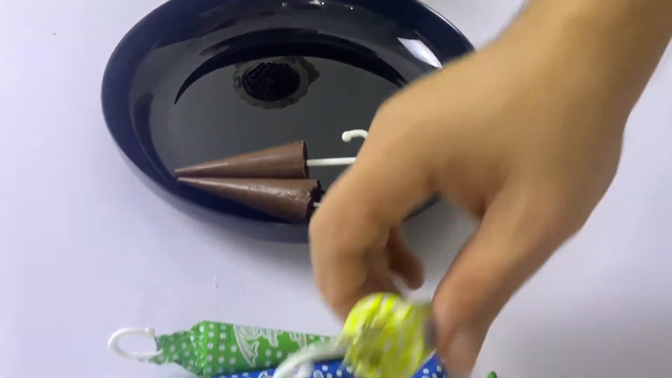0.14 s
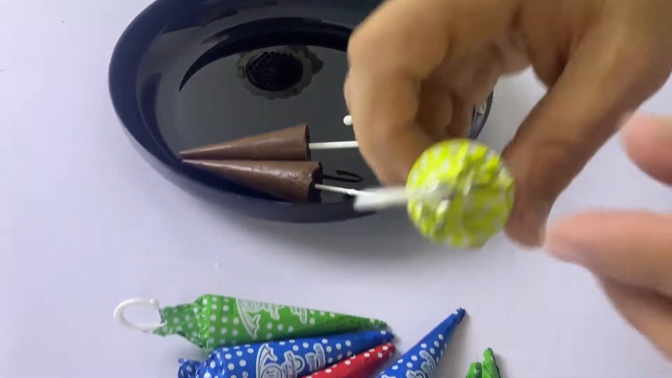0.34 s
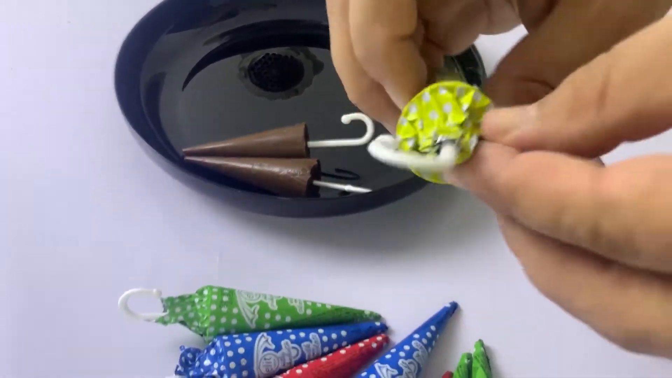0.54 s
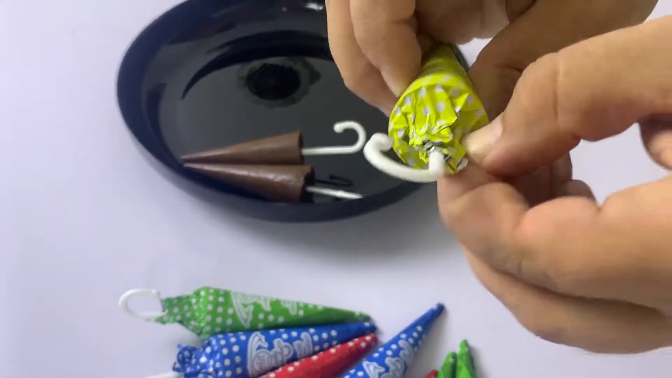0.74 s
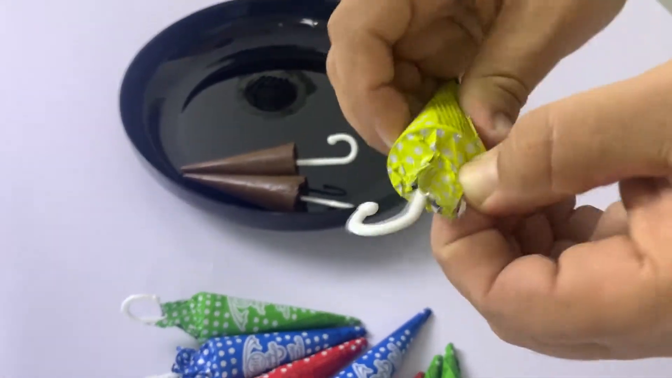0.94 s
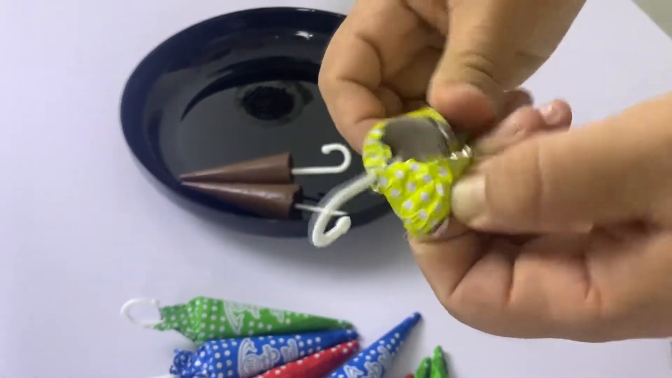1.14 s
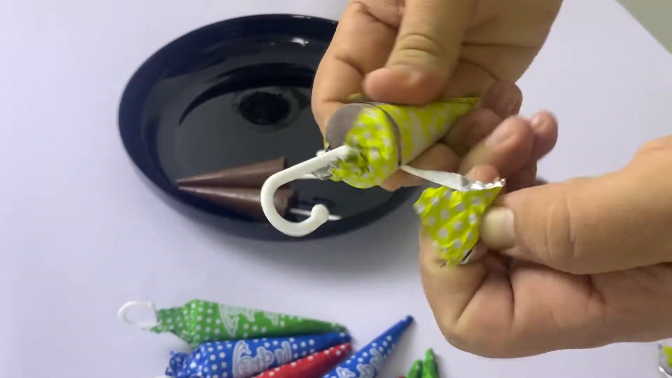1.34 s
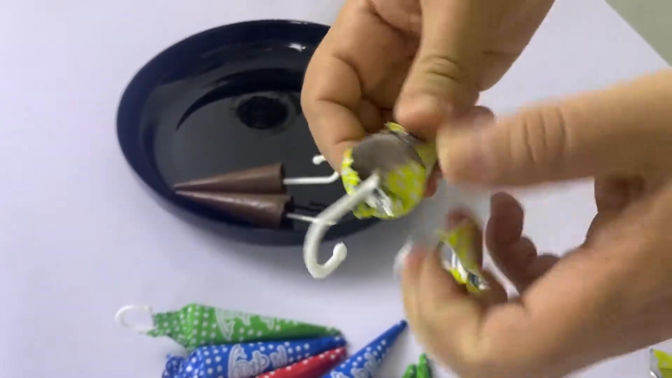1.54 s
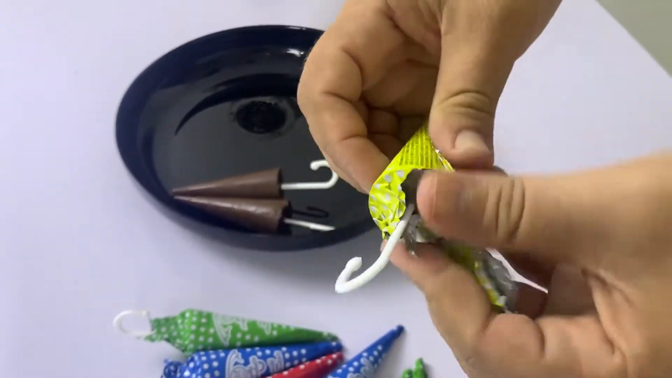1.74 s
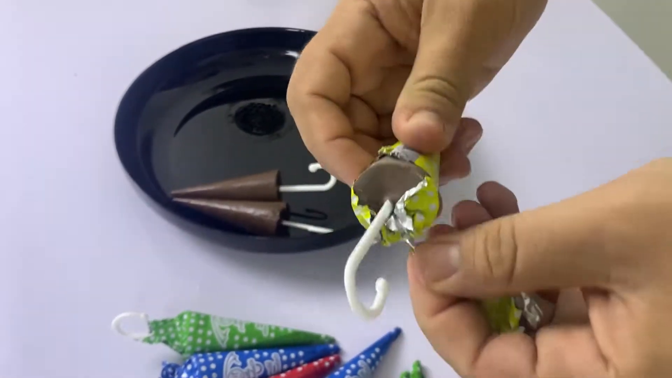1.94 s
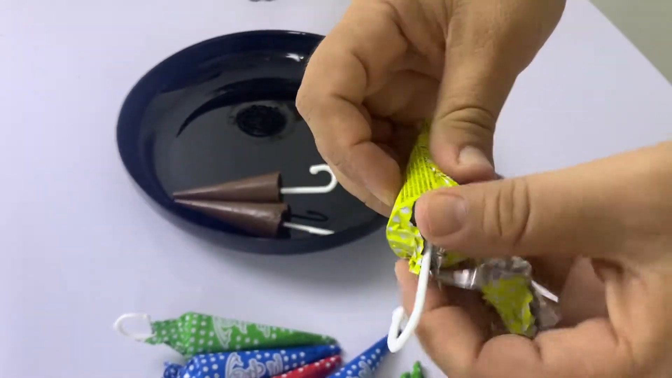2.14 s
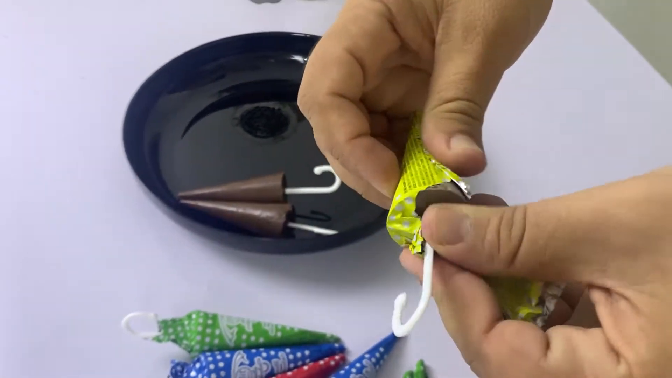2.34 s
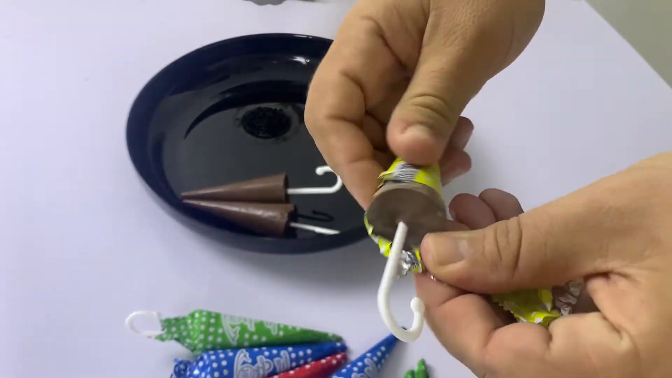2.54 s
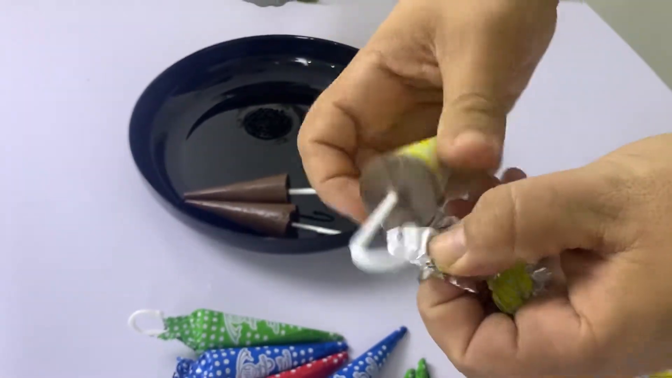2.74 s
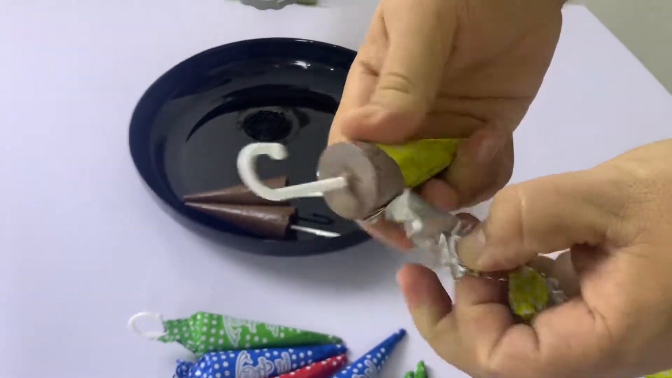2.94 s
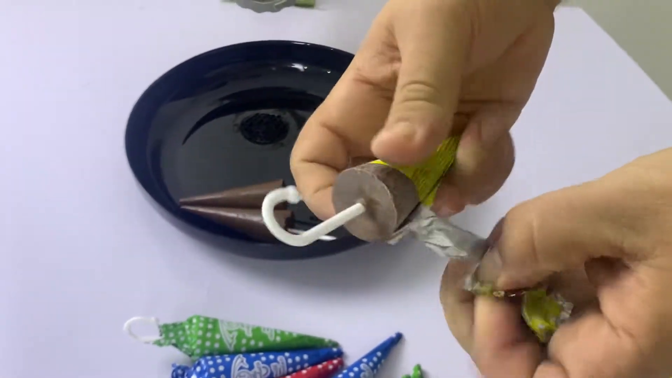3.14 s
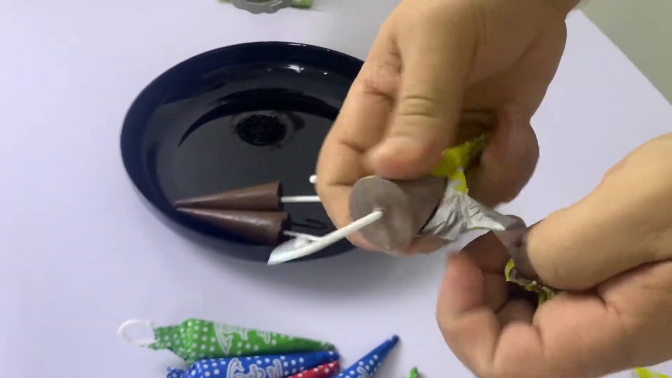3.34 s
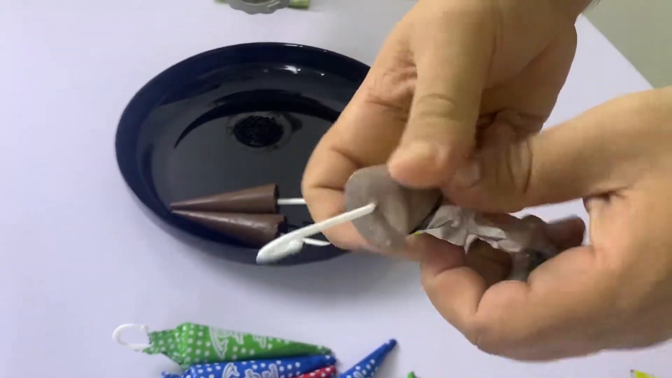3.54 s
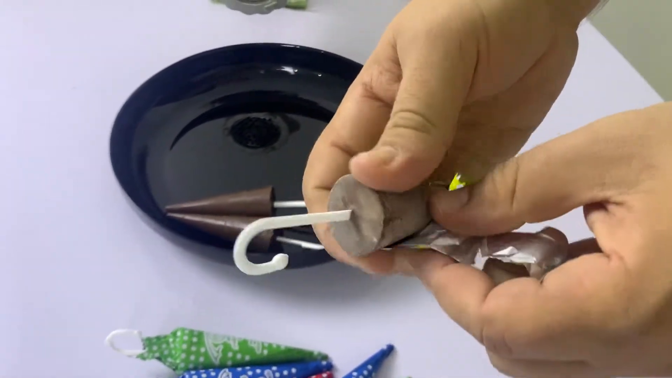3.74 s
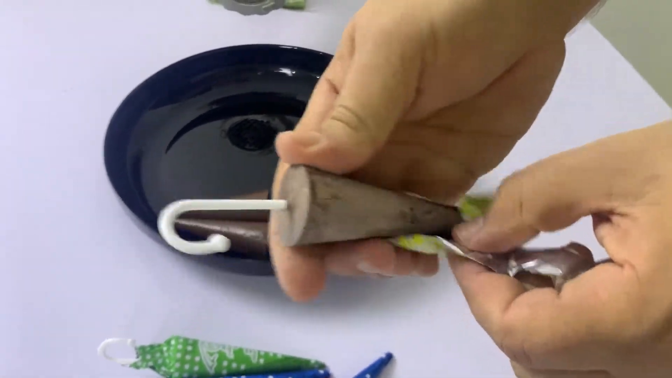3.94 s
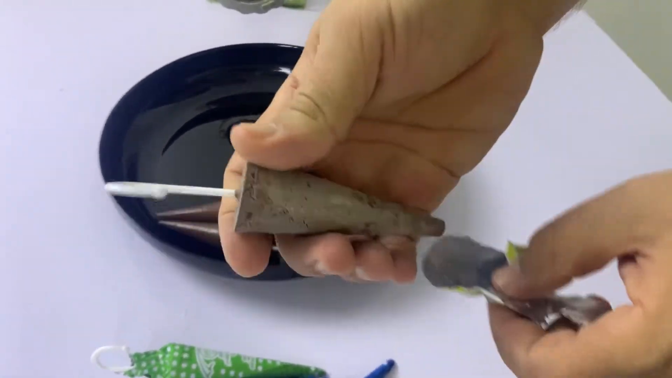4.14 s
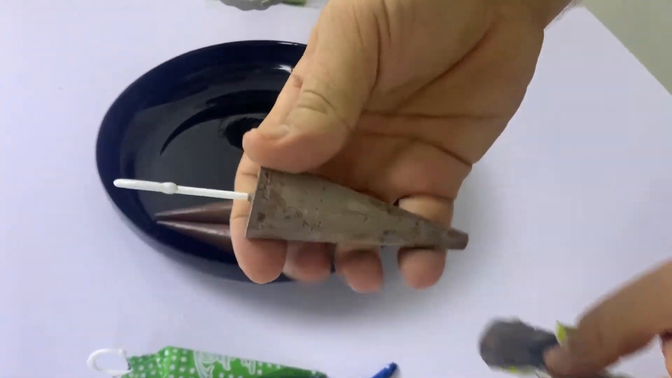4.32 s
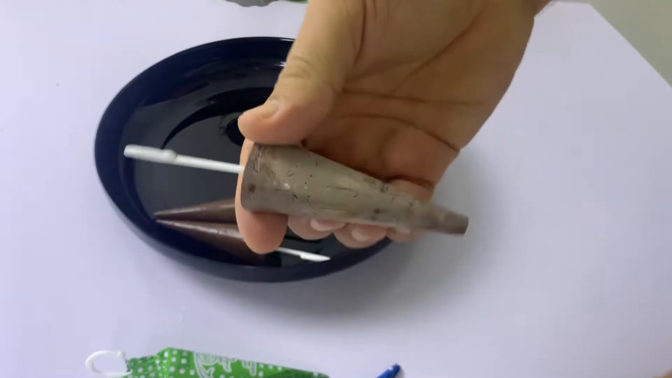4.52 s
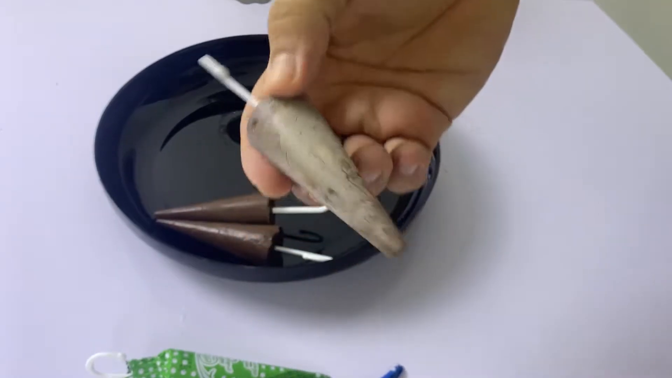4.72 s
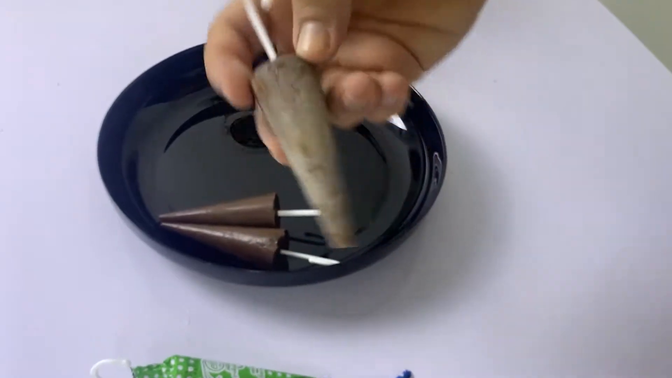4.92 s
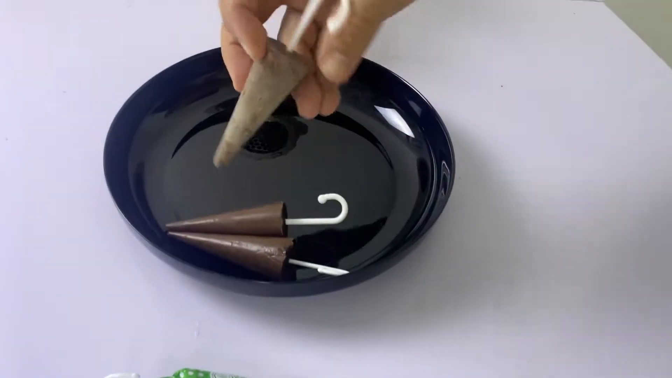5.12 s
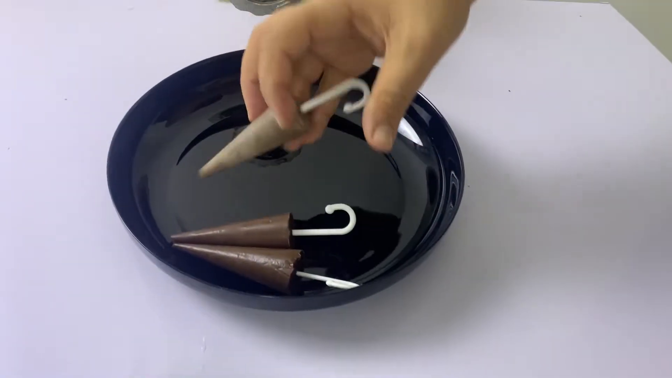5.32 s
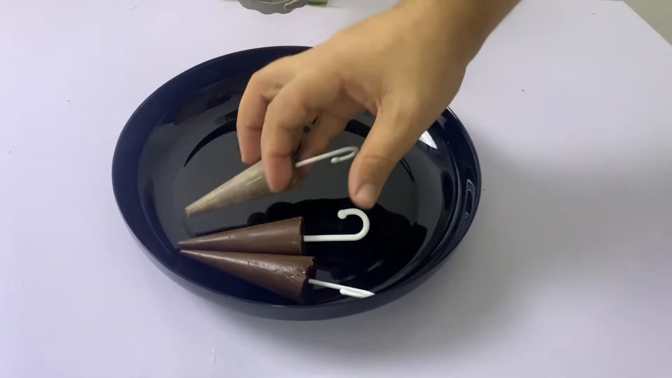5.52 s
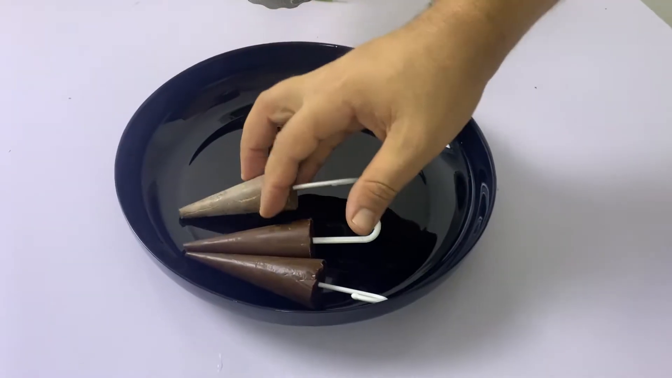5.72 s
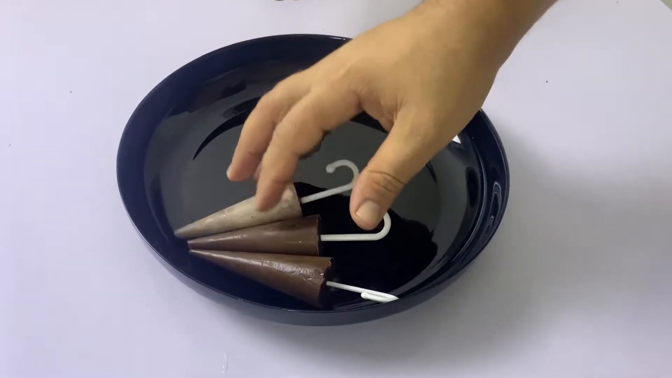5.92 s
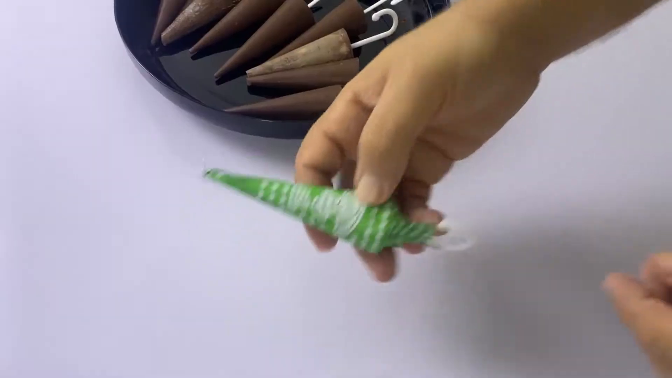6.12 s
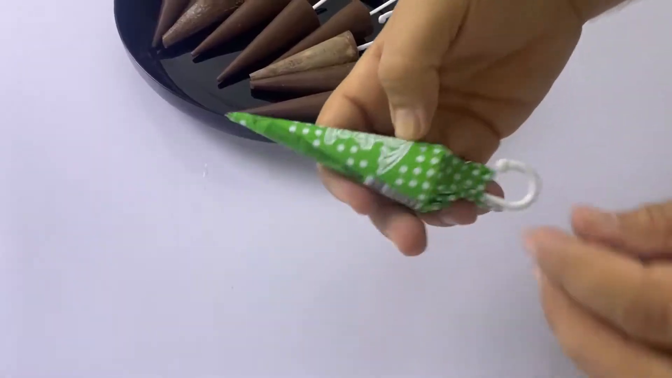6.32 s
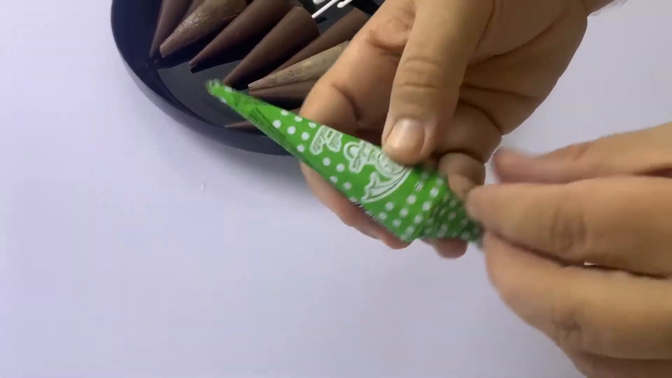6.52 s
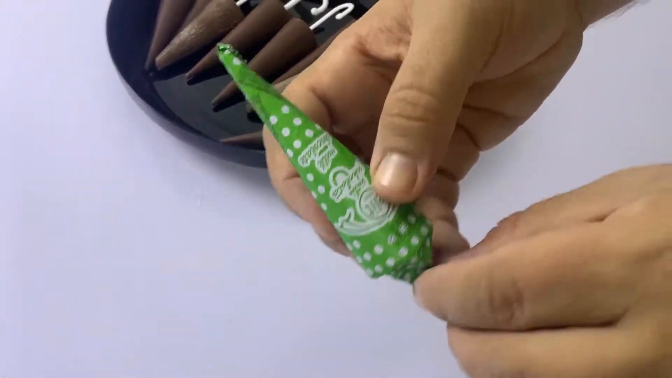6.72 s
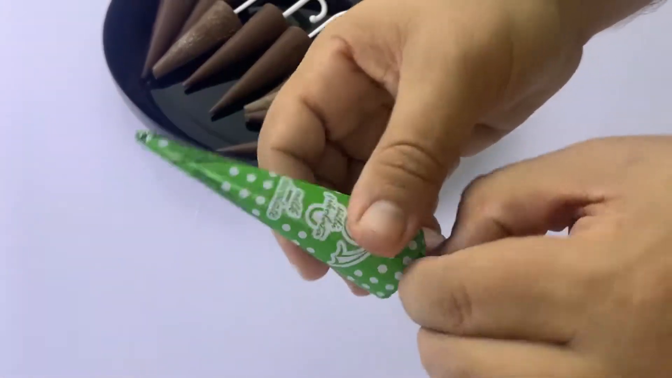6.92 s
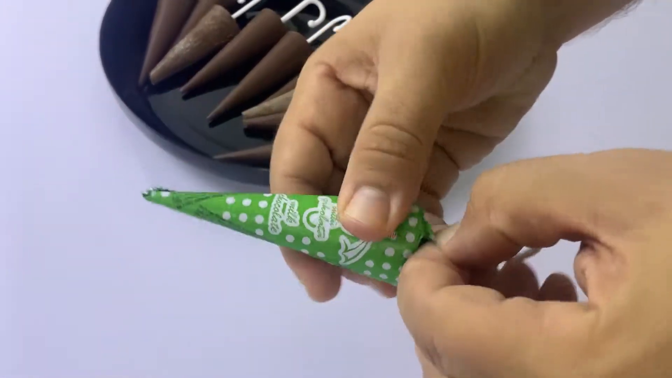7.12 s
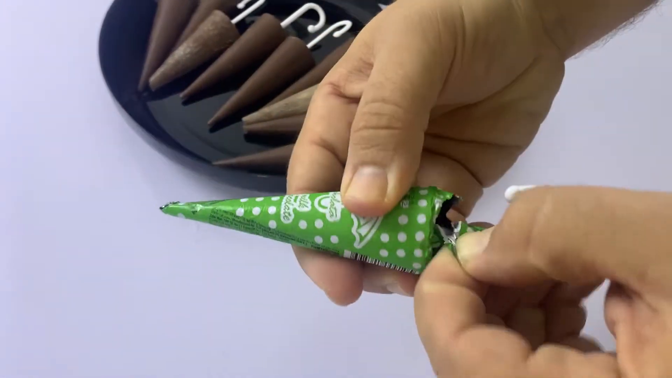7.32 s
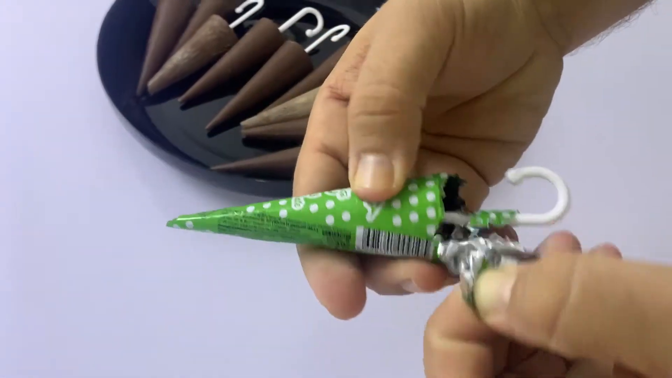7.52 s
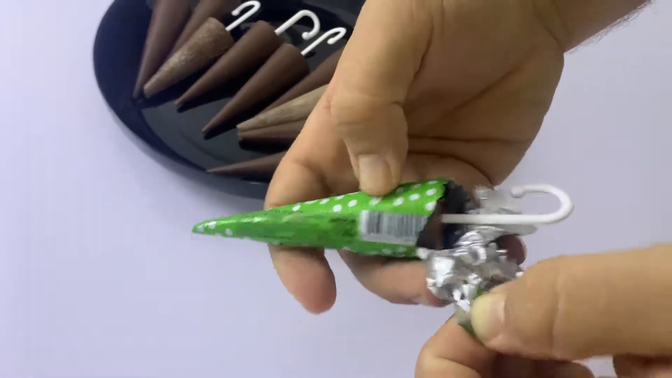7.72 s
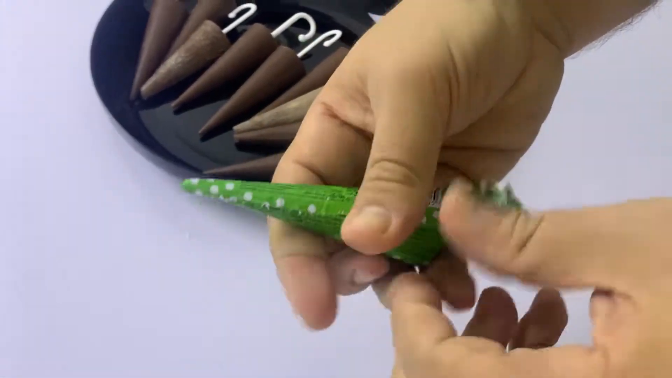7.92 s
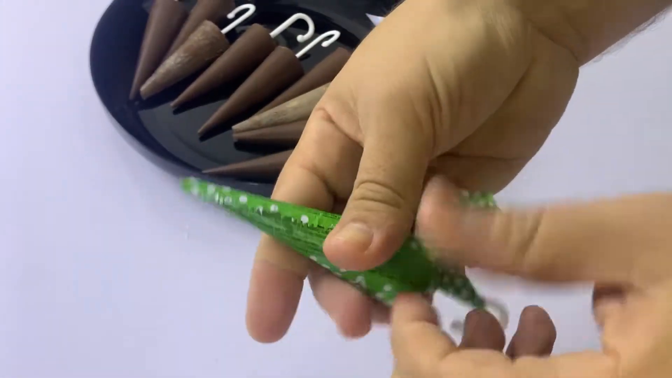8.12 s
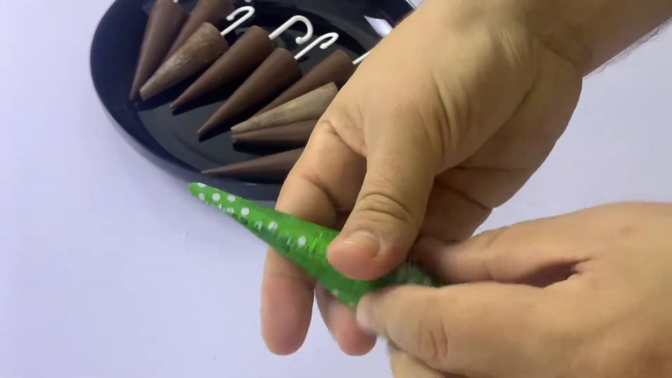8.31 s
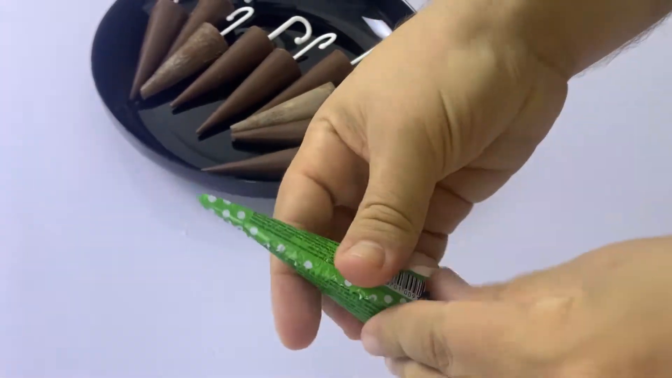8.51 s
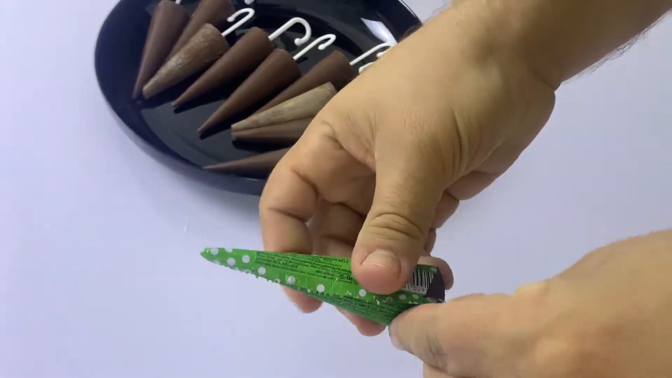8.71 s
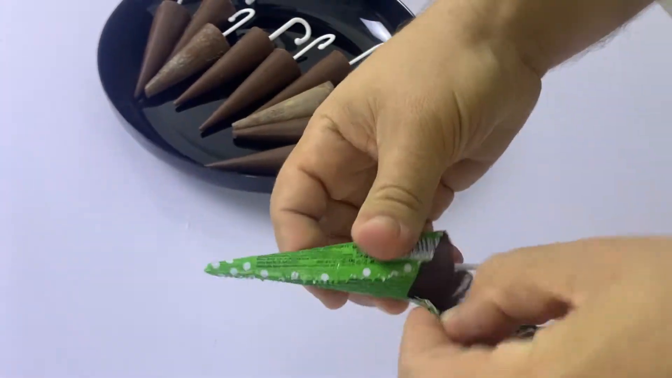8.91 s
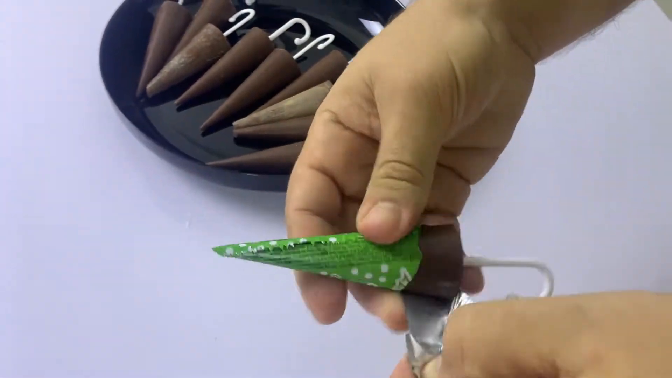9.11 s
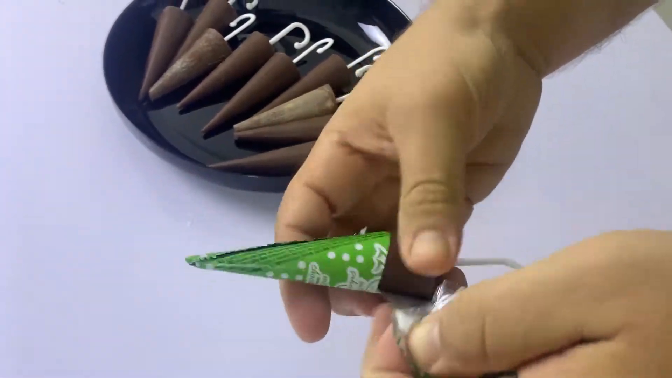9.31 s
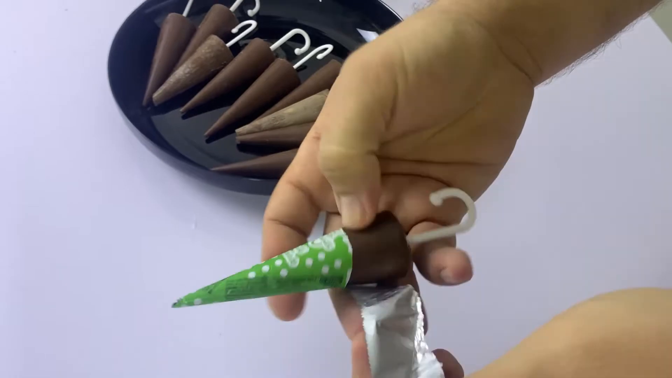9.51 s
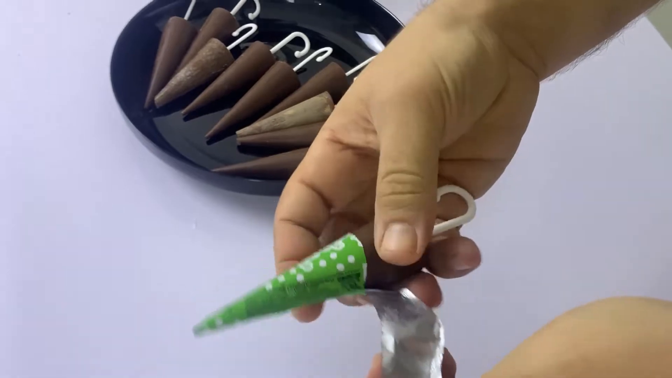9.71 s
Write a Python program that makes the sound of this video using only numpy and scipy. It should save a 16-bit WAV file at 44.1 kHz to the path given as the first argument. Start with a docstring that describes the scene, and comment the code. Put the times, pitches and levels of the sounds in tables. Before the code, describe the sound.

A small, quiet room heard close up, with faint low rumble and a barely audible thin tone. A tiny soft bump comes at 0.1 s, then from about 0.45 s fingers peel thin foil: short swelling crackles, bright ticks and sharp snaps, densest from 0.7 to 1.4 s. Smaller tugs and tears continue irregularly until about 4.25 s. From 4.9 to 5.7 s the wrapper is crushed in a fist, a denser, duller, hollow crackle in uneven squeezes. At 5.7 s a faint tap, then at 5.87 and 5.95 s hard clacks as the candy hits and bounces on a plate, its short ring stopped abruptly near 6.1 s. From 6.3 s a second wrapper rustles softly, a strong sharp snap breaks out at 7.2 s, a bright tear follows at 7.5 s, and busy crinkling pulls run on, fullest from 8.2 to 9.5 s, lasting to the end near 9.8 s.

```python
"""Thin foil is peeled off two chocolate umbrellas by hand, close up in a small, quiet room.
Pulls are swelling fine crackle through facet resonances; snaps are short decaying runs of buckles.
Between the peels the first wrapper is balled in a fist (dense crackle, hollow resonances), and the
bare chocolate drops on a plate: paired decaying modes plus noise clack, the ring cut short.
Low room rumble, a faint narrow tone and a few soft bumps lie beneath."""
import sys
import numpy as np
from scipy import signal
from scipy.fft import rfft, irfft
from scipy.io import wavfile
from scipy.ndimage import uniform_filter1d

SR = 44100
rng = np.random.default_rng(int(sys.argv[2]) if len(sys.argv) > 2 else 0)


def put_to_file(sound):
    """Save the sound as 16-bit audio at rate SR, in the file named by the first command-line argument."""
    columns = np.atleast_2d(sound).T  # one column per channel
    safe = np.clip(columns, -1, 1)
    whole_steps = np.round(safe * 32767)
    wavfile.write(sys.argv[1], SR, whole_steps.astype(np.int16))


N = 434826
TIME = np.arange(N) / SR


def amp(db):
    """Decibels to gain."""
    return 10 ** (np.asarray(db) / 20)


def evened(x):
    """Scales to rms 1."""
    return x / np.sqrt(np.mean(x ** 2) + 1e-20)


def unit(x):
    """Scales to mean energy 1 per channel."""
    return x / np.sqrt(np.mean(np.sum(x ** 2, -1)) + 1e-20)


def read(points, hz):
    """Interpolates a table on a log-frequency axis."""
    f, value = np.transpose(points)
    return np.interp(np.log(hz + 1), np.log(f + 1), value)


def level_curve(points):
    """Gain over time from a dB curve, near silent outside it."""
    return amp(np.interp(TIME, *np.transpose(points), left=-120, right=-120))


def add(mix, start_s, sound):
    """Mixes a sound in at start_s, clipped to the end of the mix."""
    part = mix[..., round(start_s * SR):][..., :sound.shape[-1]]
    part += sound[..., :part.shape[-1]]


def band(x, hz, kind, order=3):
    """Causal Butterworth low-pass or high-pass."""
    sos = signal.butter(order, min(hz, .49 * SR), kind, fs=SR, output="sos")
    return signal.sosfilt(sos, x)


def coloured(x, spectrum, size=2048):
    """Minimum-phase spectral shaping: attacks do not smear backwards."""
    hz = abs(np.fft.fftfreq(size, 1 / SR))
    log_gain = np.log(amp(np.maximum(read(spectrum, hz), -80)))
    minimum_phase = np.exp(np.conj(signal.hilbert(log_gain)))
    taps = np.fft.ifft(minimum_phase).real[:size // 2]
    return signal.oaconvolve(x, taps)[:len(x)]


def facet(x, hz, q):
    """Short ring of one small foil face: a resonant peak filter."""
    b, a = signal.iirpeak(min(hz, .4 * SR), max(q, .8), fs=SR)
    return signal.lfilter(b, a, x)


def crackle(per_s, spread_db, q, count=20):
    """Random clicks of uneven size, each ringing one facet, levelled to even strength."""
    size = amp(spread_db * np.minimum(rng.exponential(1, N), 5)) * rng.choice([-1, 1], N)
    clicks = size * (rng.random(N) < per_s / SR)
    which = rng.integers(0, count, N)
    out = np.zeros(N)
    for k, hz in enumerate(np.geomspace(600, 15000, count)):
        out += facet(clicks * (which == k), hz, q) / np.sqrt(hz)
    power = uniform_filter1d(out ** 2, size=1500)
    return out / np.sqrt(np.maximum(power, 1e-12))


# left-right likeness: f/Hz, correlation/1
PORT_LIKENESS = [(120, 0.84), (300, 0.47), (1500, 0.32)]


def paired(z, hz):
    """Two spectra become two close ports: alike in the bass, less so in the treble."""
    same = np.clip(read(PORT_LIKENESS, hz), -1, 1)
    return np.array([z[0], same * z[0] + np.sqrt(1 - same ** 2) * z[1]])


# room rumble spectrum: f/Hz, relative level/dB
AIR_SPECTRUM = [(26, -23.5), (48, -4.5), (130, -5.5), (200, -0.5), (340, -9.5), (550, -20.5), (800, -26.5),
                (2600, -35), (4200, -31.5), (7100, -40), (10000, -35.5), (15000, -84)]
# steady narrow tone: f/Hz, rms level/dB
WHINES = [(920, -83)]


def room_tone(air_db=-62.5, waver_hz=2.5):
    """Shaped noise gives steady low rumble; a very narrow noise band gives the faint tone."""
    hz = np.fft.rfftfreq(N, 1 / SR)
    z = paired(rfft(rng.standard_normal((2, N))), hz)
    air = evened(irfft(z * amp(read(AIR_SPECTRUM, hz)), N))
    whine = np.zeros((2, N))
    for f, db in WHINES:
        whine += amp(db) * evened(irfft(z / (1 + ((hz - f) / waver_hz) ** 2), N))
    return amp(air_db) * air * amp([[.6], [-.6]]) + whine


# soft bumps: t/s, relative level/dB, upper edge f/Hz
NUDGES = [(0.109, -29, 7240), (0.115, -24, 1150), (1.273, -21, 900)]
# noise of a solid contact, also in plate(): f/Hz, relative level/dB
CLACK_SPECTRUM = [(30, -42), (60, -15.5), (290, -14), (420, -27), (900, -16.5), (1800, -16.5), (2700, -17),
                  (3250, -20.5), (3700, -17), (4400, -21.5), (6800, -30), (7600, -38), (9600, -37.5),
                  (12500, -73)]


def nudges(decay_s=0.015):
    """A candy picked up or jerked: decaying contact noise, low-passed per bump."""
    out, t = np.zeros(N), np.arange(4096) / SR
    for start_s, db, edge_hz in NUDGES:
        bump = coloured(rng.standard_normal(len(t)) * np.exp(-t / decay_s), CLACK_SPECTRUM)
        add(out, start_s, amp(db) * unit(band(bump, edge_hz, "low")))
    return out


def crinkles(per_s=170, spread_db=4.5, run_s=.00035, count=8):
    """Single creases: very short decaying noise runs, each on one random facet."""
    size = amp(spread_db * np.minimum(rng.exponential(1, N), 2.5))
    starts = size * (rng.random(N) < per_s / SR)
    decay = np.exp(-1 / (run_s * SR))
    runs = signal.lfilter([1], [1, -decay], starts + 1e-12) * rng.standard_normal(N)
    which = rng.integers(0, count, N)[np.cumsum(starts > 0)]
    out = np.zeros(N)
    for k, hz in enumerate(np.geomspace(1500, 14000, count)):
        out += facet(runs * (which == k) + 1e-12, hz, q=1.5)
    return evened(out)


def stroke(length_s, swell_share=0.1, ease_db=-0.5, release_s=0.0047):
    """One hand stroke: linear swell, hold easing as the foil yields, exponential release."""
    t = np.arange(0, length_s + 6 * release_s, 1 / SR)
    swell = np.minimum(t / (swell_share * length_s), 1)
    hold = amp(ease_db * (np.minimum(t / length_s, 1) + 2.0))
    release = np.exp(-np.maximum(t - length_s, 0) / release_s)
    return swell * hold * release


# foil spectrum, also in grip() and snaps(): f/Hz, relative level/dB
FOIL_SPECTRUM = [(200, -29.5), (420, -15), (850, -16.5), (1300, -14.5), (2200, -8), (3200, -8.5),
                 (4200, -3.5), (5500, -7.5), (7500, -10.5), (10000, -16.5), (14000, -21), (16000, -30)]
# finger pulls: t/s, length/s, relative crackle level/dB, ring f/Hz,
# relative loose-flap body/dB, relative tearing sheen/dB
PULLS = [(0.448, 0.11, -66, 9000, -22, -17), (0.712, 0.076, -47.5, 5660, -40, 0),
         (0.971, 0.046, -46, 2830, -34, -4), (1.078, 0.11, -43.5, 4860, -10.5, -5.5),
         (1.248, 0.13, -45.5, 5770, -22, -9), (1.382, 0.075, -49.5, 4900, -9, -9),
         (1.756, 0.15, -53, 5040, -12, -1.5), (2.019, 0.21, -52, 4900, -14.5, -9),
         (2.419, 0.026, -50.5, 4950, -31, -7), (2.508, 0.042, -49, 5940, -21, -12),
         (2.73, 0.081, -48, 6460, -21, -4.5), (2.835, 0.18, -48.5, 9150, -11, -5),
         (3.168, 0.035, -50.5, 9000, -9, -8), (3.353, 0.045, -47, 2530, -17, 2),
         (3.575, 0.15, -49.5, 2800, -20, 1.5), (3.79, 0.15, -62.5, 9000, -2.5, 6),
         (3.865, 0.12, -46.5, 2010, -5.5, -12), (4.099, 0.071, -45.5, 835, -16, -8),
         (4.229, 0.023, -50.5, 5300, -13, -13), (6.32, 0.055, -60.5, 810, -33, -33),
         (6.62, 0.11, -60.5, 3190, -23, -14), (6.864, 0.14, -54, 6300, -18, -9),
         (7.237, 0.065, -55, 800, -25, -20), (7.501, 0.019, -35.5, 4500, -26, -5.5),
         (7.522, 0.099, -42.5, 3060, -16.5, -6), (7.821, 0.059, -46.5, 2700, -13, -12),
         (8.04, 0.055, -45.5, 2900, -45, -21), (8.137, 0.045, -47.5, 8650, -19, -24),
         (8.255, 0.05, -45.5, 3300, -12, -6.5), (8.346, 0.032, -46, 2500, -8, -17),
         (8.484, 0.046, -50, 2100, -22, -10), (8.619, 0.057, -42.5, 3720, -13, -5),
         (8.83, 0.059, -47.5, 4250, -30, -20), (8.871, 0.074, -40.5, 3900, -10.5, -12),
         (9.011, 0.12, -41.5, 930, -8.5, -17), (9.302, 0.11, -44, 3100, -7.5, -8.5),
         (9.405, 0.11, -41.5, 3000, -6.5, -6), (9.625, 0.1, -55, 3150, -5, -8),
         (9.774, 0.063, -47.5, 3560, -7.5, -5)]


def peeling(crackle_db=-1, body_db=-1, sheen_db=-1, skirt_db=-2, q=1.9, grip_db=-1.5):
    """Each pull rings its own foil stretch; a loose flap adds body, a running tear sheen."""
    fine = evened(crackle(per_s=1900, spread_db=4.5, q=1.7))
    creases = crinkles()
    grains = coloured(fine + creases, FOIL_SPECTRUM)
    body = evened(band(grains, 1460, "low"))
    middle = evened(band(band(grains, 1550, "high"), 8900, "low", order=5))
    # the top comes mostly from separate creases
    bright = coloured(fine + 2 * creases + 4 * crinkles(per_s=80), FOIL_SPECTRUM)
    sheen = evened(band(bright, 7800, "high", order=5))
    out = amp(grip_db) * grip(body)
    for start_s, length_s, db, hz, flap_db, tear_db in PULLS:
        first = round(start_s * SR)
        envelope = stroke(length_s)[:N - first]
        now = first + np.arange(len(envelope))
        ring = evened(evened(facet(middle[now], hz, q)) + amp(skirt_db) * middle[now])
        layers = amp(crackle_db) * ring
        layers += amp(body_db + flap_db) * body[now]
        layers += amp(sheen_db + tear_db) * sheen[now]
        add(out, start_s, amp(db) * envelope * layers)
    return out


# grip on the candy, one curve per wrapper: t/s, relative rustle level/dB
GRIPS = [
    [(0.45, -69), (0.82, -62.5), (1.25, -47.5), (1.56, -78), (1.9, -58), (2.36, -71), (2.66, -57),
     (2.9, -55.5), (3.75, -46.5), (4.38, -89)],
    [(6.3, -66), (6.85, -57.5), (7.6, -56), (7.75, -63), (8.2, -56.5), (8.8, -53), (9.1, -71),
     (9.22, -63.5), (9.86, -62)],
]


def grip(body, hz=4300, skirt_db=2, body_db=-13.5, sheen_db=-6.5):
    """Foil still tight on the candy rustles in sparse high ticks, following the grip."""
    hold = sum(level_curve(curve) for curve in GRIPS)
    grains = crinkles(per_s=170) + amp(-11) * rng.standard_normal(N)
    ticks = evened(coloured(grains, FOIL_SPECTRUM))
    ring = evened(facet(ticks, hz, q=1.4))
    sheen = evened(band(ticks, 7800, "high", order=5))
    rustle = evened(ring + amp(skirt_db) * ticks)
    return hold * (rustle + amp(body_db) * body + amp(sheen_db) * sheen)


# foil snaps: t/s, relative level/dB, buckling facet f/Hz, relative sheen/dB
SNAPS = [(0.733, -26, 4000, -16), (0.749, -23, 2600, 3.5), (0.858, -26.5, 6300, -23),
         (0.978, -19.5, 2600, 5), (0.982, -25.5, 3570, -15), (0.994, -30, 2890, -1), (1.058, -33, 2900, -5),
         (1.155, -22.5, 2440, 1.5), (1.18, -19, 4600, -7.5), (1.182, -27, 710, -11), (1.272, -23, 5160, -8),
         (1.44, -36, 1500, -12), (1.699, -31.5, 3570, 0), (1.785, -34.5, 2460, -13),
         (1.794, -31.5, 2640, -4), (1.901, -36, 6130, -30), (2.127, -40, 4130, -22),
         (2.269, -35.5, 3700, -3), (2.505, -24, 4800, -26), (2.699, -41, 9200, -10),
         (2.985, -34, 3130, -15), (3.182, -31, 2650, 1), (3.223, -34, 4950, -1), (3.299, -30, 1740, 7),
         (3.586, -32, 2390, -7), (3.621, -29.5, 2770, -32), (3.696, -27.5, 3430, -21),
         (3.763, -34.5, 2490, -13), (3.798, -33, 2600, -6), (3.856, -31.5, 2490, -4),
         (3.906, -28, 1620, -36), (3.925, -27.5, 1230, -9), (3.933, -28, 1990, -11),
         (4.099, -33.5, 1670, -11), (4.934, -34.5, 2470, -19), (4.976, -38, 2200, -31),
         (5.135, -39, 3500, -33), (5.548, -33.5, 2450, -3.5), (6.554, -37, 4400, -2), (6.944, -26, 1280, 1),
         (6.963, -35, 1330, 14), (6.996, -30, 7700, 0), (7.027, -29, 4700, -19), (7.157, -35.5, 3870, -25),
         (7.218, -12.5, 1850, -13), (7.292, -27, 1940, -21), (7.3182, -18.5, 2320, -41),
         (7.391, -24.5, 3000, -7), (7.504, -30, 2890, -5), (7.516, -22, 4300, -4), (7.646, -35, 8600, -1),
         (7.755, -33, 4400, -26), (7.855, -29.5, 2450, -13), (7.948, -35, 2300, -24),
         (7.964, -37, 2220, -25), (8.278, -23, 3000, -3.5), (8.372, -35, 2280, -5), (8.757, -35, 4500, -11),
         (8.913, -20, 970, -3), (8.983, -30, 2350, -14), (9.057, -21.5, 6250, -21), (9.234, -36, 3140, -13),
         (9.271, -31.5, 3000, -9), (9.768, -38, 2800, -13), (9.803, -29.5, 6500, -7.5)]


def snaps(gain_db=17, sheen_db=4, skirt_db=-1, rise_s=0.001, run_s=0.0038, lead_s=0.0028,
          db_per_octave=45, db_per_doubling=17):
    """A crease gives way: warning creaks, one sharp buckle, a dying run of smaller ones."""
    out, t = np.zeros(N), np.arange(2048) / SR - lead_s
    for start_s, db, hz, sheen in SNAPS:
        # low sheen = pinched crease: shorter run
        stretch = 2 ** (min(sheen, 0) / db_per_doubling)
        run = np.exp(np.minimum(t / rise_s, -t / run_s) / stretch)
        buckles = rng.standard_normal(len(t)) * (rng.random(len(t)) < .2) * run
        buckles[run.argmax()] = 2.4
        sheet = coloured(buckles, FOIL_SPECTRUM)
        ring = unit(facet(sheet, hz, q=3.5)) + amp(skirt_db) * unit(sheet)
        # a pinched crease also loses its upper ring
        edge_hz = max(8500 * 2 ** (sheen / db_per_octave), 1.79 * hz)
        ring = unit(band(ring, edge_hz, "low", order=4))
        fizz = unit(band(sheet, 5700, "high"))
        snap = unit(ring + amp(sheen + sheen_db) * fizz)
        add(out, start_s + t[0], amp(db + gain_db) * snap)
    return out


# balled foil spectrum: f/Hz, relative level/dB
BALLED_SPECTRUM = [(450, -27), (1000, -14), (2400, -6), (5200, -4), (7200, -13.5), (15000, -32.5)]
# fist pressure: t/s, relative crackle level/dB
SQUEEZE = [(4.45, -71), (4.62, -67), (4.8, -88), (4.86, -53.5), (4.944, -49.5), (5.024, -54),
           (5.142, -49.5), (5.246, -65), (5.432, -52), (5.482, -65), (5.554, -45.5), (5.63, -56),
           (5.66, -41.5), (5.7, -69)]
# resonances of the fist's hollow: f/Hz
FIST_HZ = [1650, 2350, 3110, 3950, 5160]


def balling(fist_q=28, skirt_db=6):
    """Dense, dull crackle of foil squeezed in a fist, whose hollow rings."""
    grains = coloured(crackle(per_s=2600, spread_db=4.2, q=4), BALLED_SPECTRUM)
    hollow = evened(sum(facet(grains, hz, fist_q) for hz in FIST_HZ))
    return level_curve(SQUEEZE) * evened(hollow + amp(skirt_db) * evened(grains))


# blows: t/s, relative level/dB, nominal contact time/s, bowl's hollow-ring boost/dB
KNOCKS = [(5.687, -29.5, 0.00035, -3), (5.865, -11, 0.000017, -12.5), (5.872, -14.5, 0.000019, -14.5),
          (5.924, -13, 0.00011, 3.5), (5.958, -6.5, 0.00011, 0)]
# plate modes: f/Hz, relative level/dB, t60/s
PLATE_MODES = [(129, -14.5, .9), (275, -10, .2), (308, -10, .2), (667, -16, .15), (861, -8, .25),
               (892, -10, .5), (1075, -6, .14), (1330, -3.5, .16), (1361, -7, .2), (1421, -13, .42),
               (1761, 2, .13), (1796, -6, .3), (1954, -8, .15), (2040, -4.5, .24), (2478, -2, .16),
               (2690, -6, .16), (2885, -10, .22), (3570, -6, .14), (4045, -10, .2), (4936, -13, .25),
               (6150, -9.5, .18), (8080, -22, .3), (8330, -21, .1)]


def plate(boom_db=-15, boom_s=0.13, clack_db=16.5, ring_db=19, clack_s=0.0034, split=0.002,
          thud_hz=380, thud_db=-5, ring_stop_s=6.097):
    """Chocolate and handle strike and bounce; softer contacts damp the upper modes."""
    out, t = np.zeros((2, N)), np.arange(SR // 2) / SR
    for start_s, db, contact_s, bowl_db in KNOCKS:
        ring = np.zeros((2, len(t)))
        for hz, mode_db, t60_s in PLATE_MODES:
            # phase/cycles: ports differ more in higher modes
            phase = rng.random() + min(hz / 8000, .3) * rng.standard_normal((2, 1))
            hollow_db = bowl_db * (600 < hz < 950)
            # the bowl's ring reaches the right port late
            phase[1] -= .29 * (800 < hz < 950)
            decay = amp(mode_db + hollow_db - 60 * t / t60_s)
            # a round plate's modes come in close pairs
            for twin in rng.normal(1, split, 2):
                ring += decay * np.sin(2 * np.pi * (hz * twin * t + phase))
        burst = rng.standard_normal(len(t)) * np.exp(-t / clack_s)
        clack = unit(coloured(burst, CLACK_SPECTRUM))
        # thud alike in both ports; clatter scatters round the plate
        thud = band(clack, thud_hz, "low")
        upper = band(clack, thud_hz, "high")[None]
        paths = scatter(near_db=4.5, wet_db=-5.0)
        clatter = signal.fftconvolve(upper, paths, axes=1)[:, :len(t)]
        blow = amp(ring_db) * unit(ring)
        blow += amp(clack_db) * (unit(clatter) + amp(thud_db) * thud)
        # the table booms on under the plate
        boom = rng.standard_normal(len(t)) * np.exp(-t / boom_s)
        boom = band(band(boom, 190, "low"), 60, "high")
        blow += amp(clack_db + boom_db) * unit(boom)
        add(out, start_s, amp(db) * band(blow, .5 / contact_s, "low", order=1))
    return out * np.clip((ring_stop_s - TIME) / 0.0005, 0, 1)


# table echo, later as the hands rise: t/s, delay/ms
TABLE_ECHO = [(1.1, 0.64), (1.8, 1.37), (4.2, 1.46), (6.9, 0.68), (7.25, 1.01), (7.9, 0.37), (8.3, 0.497),
              (8.95, .95), (9.5, 1.08)]


def table_echo(x, echo_db=-6, top_hz=3500):
    """Table reflection: a sliding delay makes a comb that moves with the hands."""
    delay_s = np.interp(TIME, *np.transpose(TABLE_ECHO)) / 1000
    echo = np.interp(TIME - delay_s, TIME, x)
    return (x + amp(echo_db) * band(echo, top_hz, "low", order=1)) / np.hypot(1, amp(echo_db))


# room decay: f/Hz, t60/s
ROOM_DECAY = [(150, 0.54), (1000, 0.46), (4000, 0.38), (8000, 0.31), (15000, 0.15)]


def scatter(near_db, wet_db, lead_ms=.09, sway_ms=0.024, near_s=0.0046, apart=1.0):
    """Impulse response: direct sound and hand/table scatter, left port first, then room tail."""
    t = np.arange(SR // 2) / SR
    paths = unit(rng.standard_normal((3, len(t))) * np.exp(-t / near_s))
    close = (t == 0) + amp(near_db) * (paths[2] + apart * paths[:2])
    lag_ms = abs(lead_ms + sway_ms * rng.standard_normal())
    close[1] = np.roll(close[1], round(lag_ms * SR / 1000))
    noise = rng.standard_normal((2, len(t))) * (t > .004)
    hz, at_s, z = signal.stft(noise, SR, nperseg=256)
    z = paired(z, hz[:, None]) * amp(-60 * at_s / read(ROOM_DECAY, hz)[:, None])
    tail = signal.istft(z, SR, nperseg=256)[1][:, :len(t)]
    return unit(unit(close) + amp(wet_db) * unit(tail))


def room(x, near_db, wet_db, size=6144):
    """Moving hands: each stretch of `size` samples gets new paths to the microphone."""
    out = np.zeros((2, N))
    for start in range(0, N, size):
        stretch = x[None, start:start + size]
        if stretch.any():
            paths = scatter(near_db, wet_db)
            add(out, start / SR, signal.fftconvolve(stretch, paths, axes=1))
    return out


def scene():
    """Foil near the microphone, fist farther off, plate on the table, room tone below."""
    foil = room(table_echo(snaps()), near_db=-9, wet_db=-12)
    foil += room(table_echo(peeling()), near_db=-6, wet_db=-11)
    # the fist stays put: one fixed set of paths
    aside = room(balling() + nudges(), near_db=3.5, wet_db=-8, size=N)
    hands = (foil + aside) * amp([[.2], [-.2]])
    return hands + plate() * amp([[1], [-1]]) + room_tone()


# treble bands the microphone ports swallow: f/Hz, q/1, depth/1
PORT_DIPS = [(7560, 14, 0.49), (11560, 6.8, 1)]


def record(dry, edge_hz=15900):
    """Microphone ports notch two narrow treble bands; a linear-phase low-pass limits the top."""
    ported = dry - sum(min(depth, 1) * facet(dry, hz, q) for hz, q, depth in PORT_DIPS)
    taps = signal.firwin(255, edge_hz, window=("kaiser", 9), fs=SR)
    return signal.oaconvolve(ported, taps[None], "same")


dry = scene()
out = record(dry)
put_to_file(out)
```